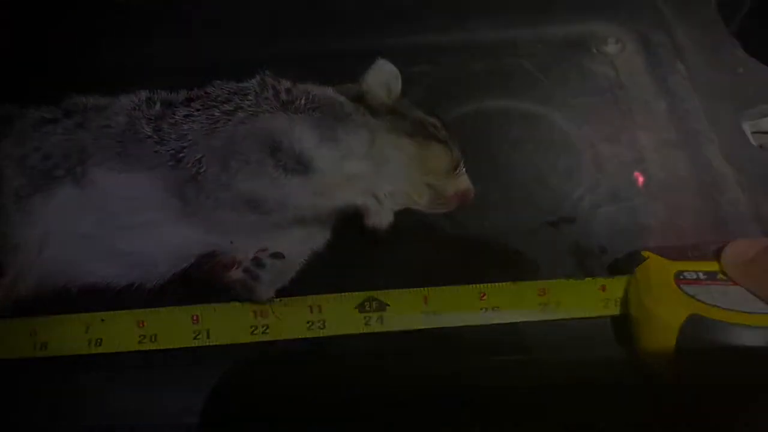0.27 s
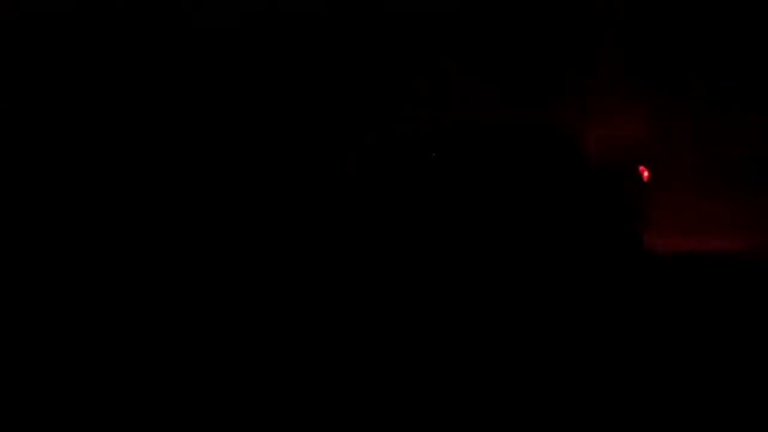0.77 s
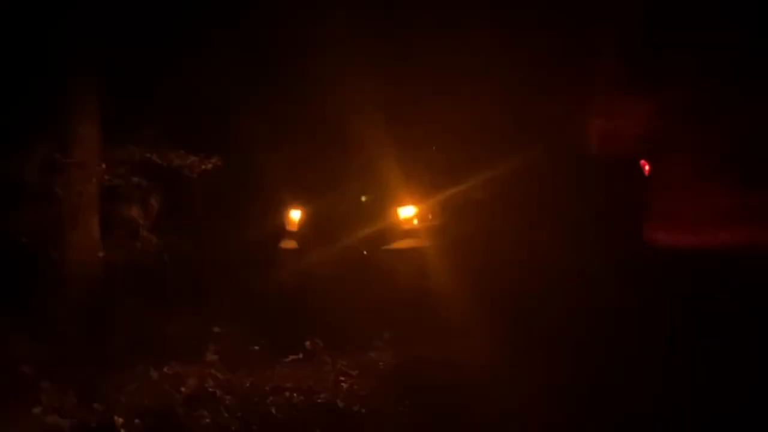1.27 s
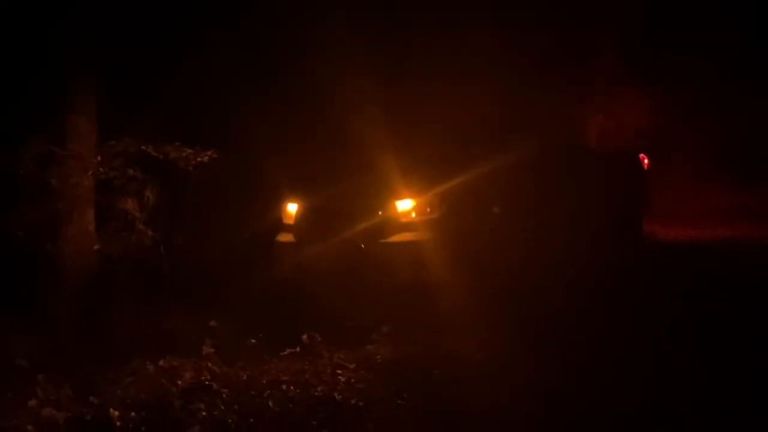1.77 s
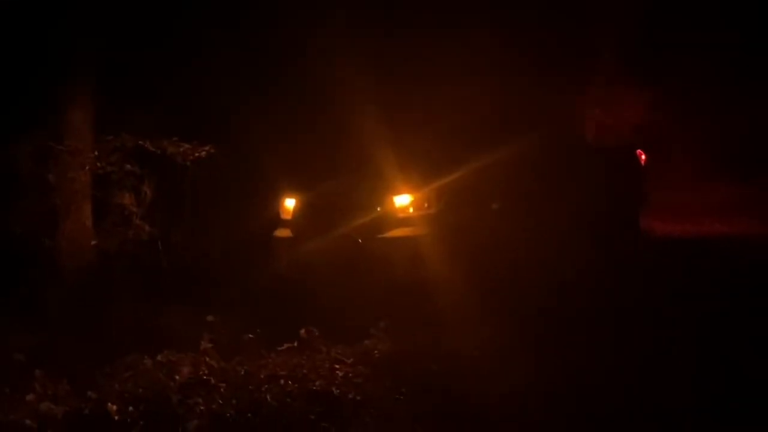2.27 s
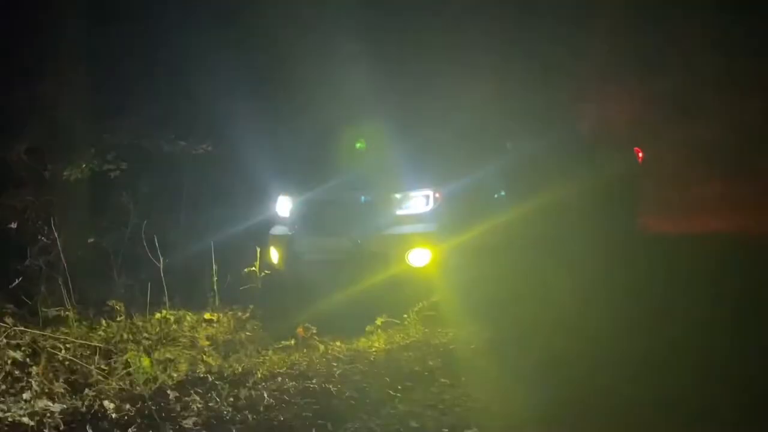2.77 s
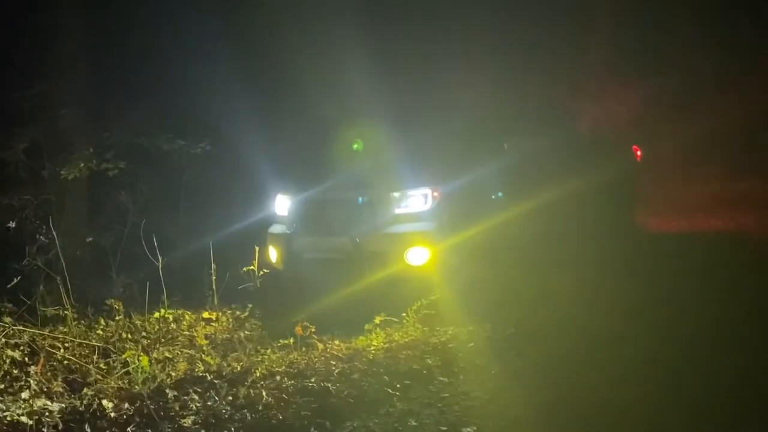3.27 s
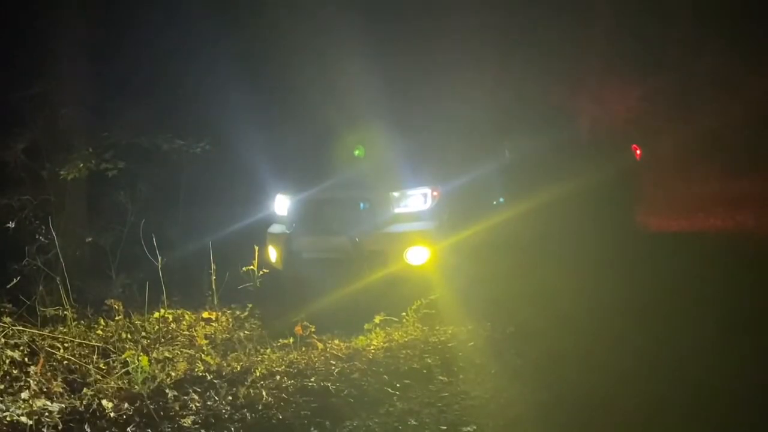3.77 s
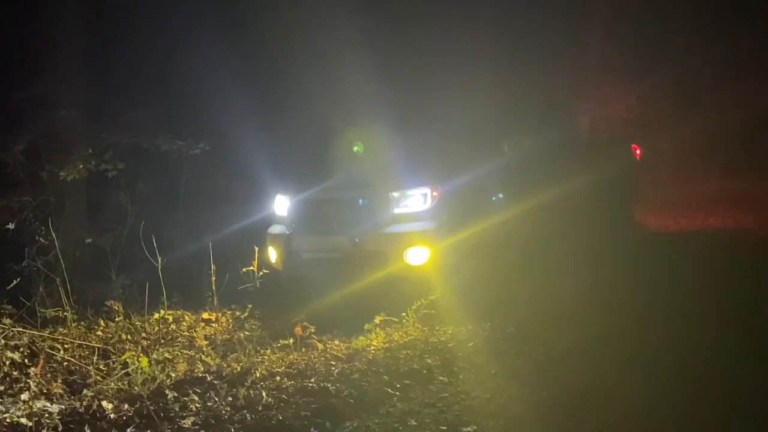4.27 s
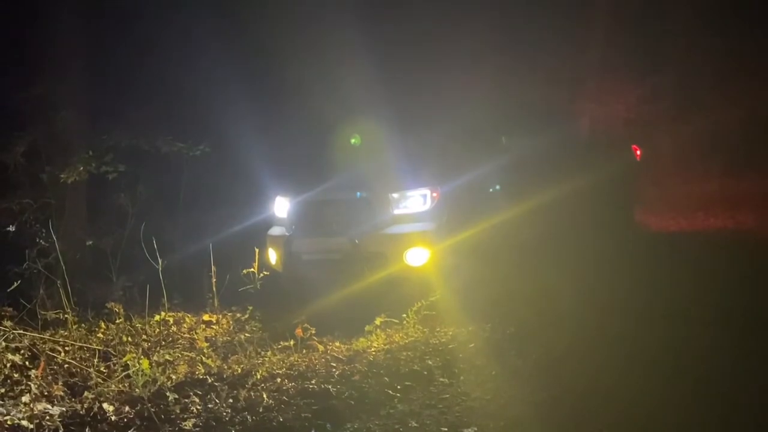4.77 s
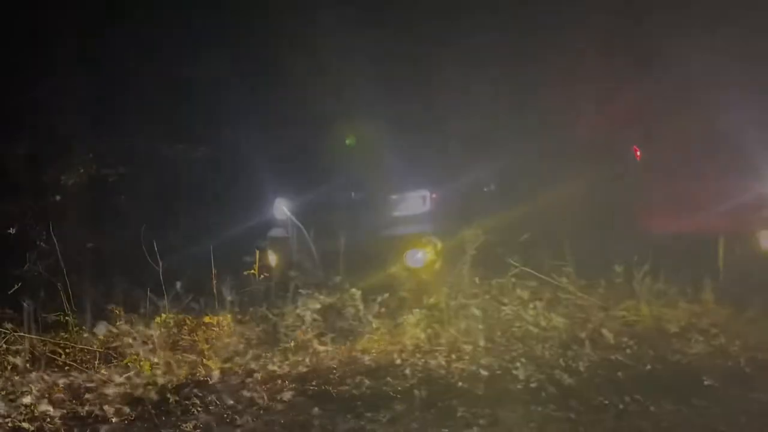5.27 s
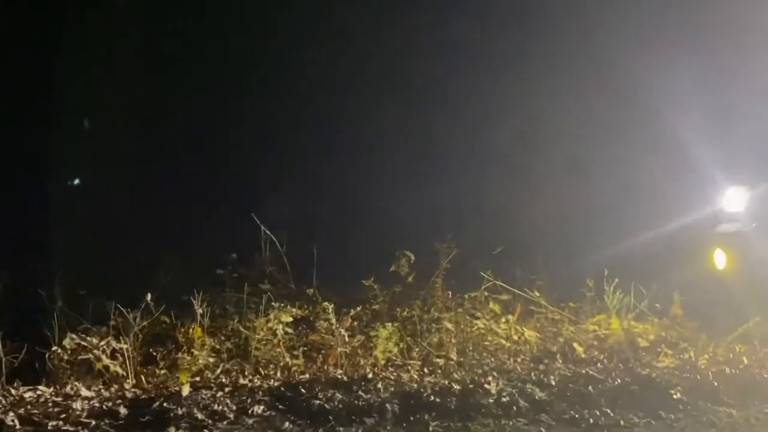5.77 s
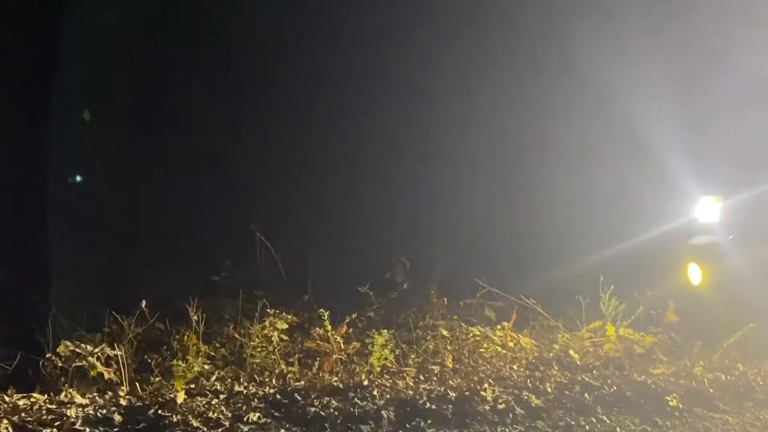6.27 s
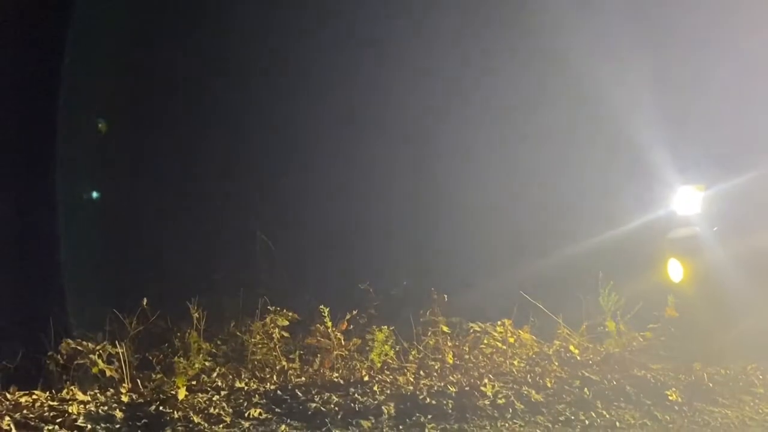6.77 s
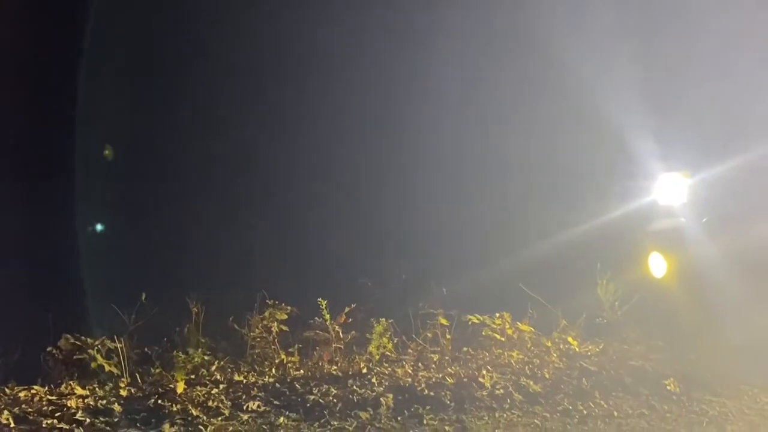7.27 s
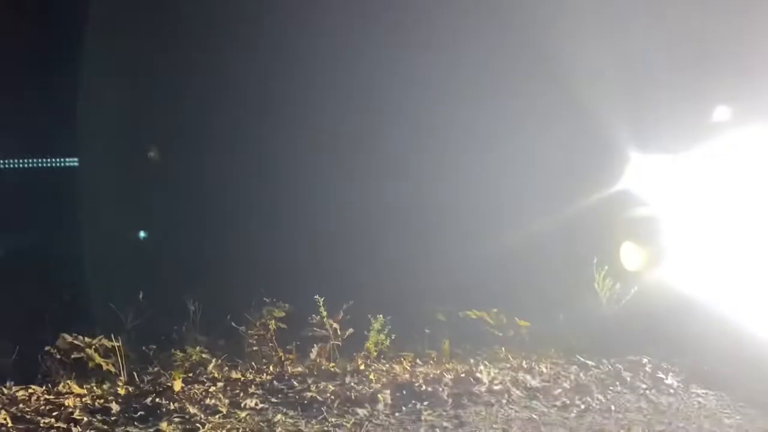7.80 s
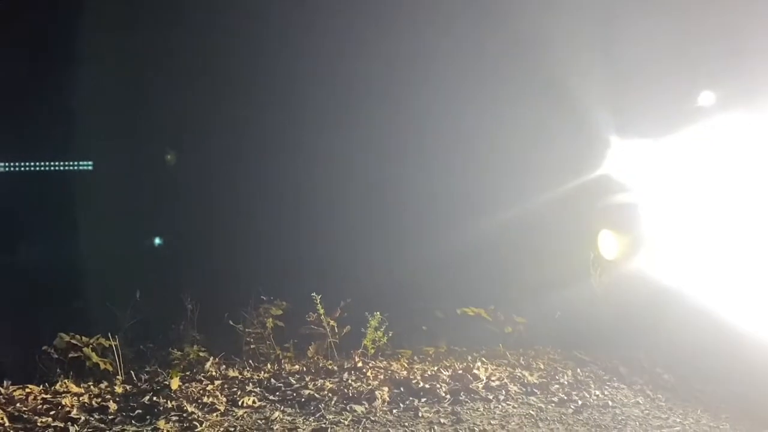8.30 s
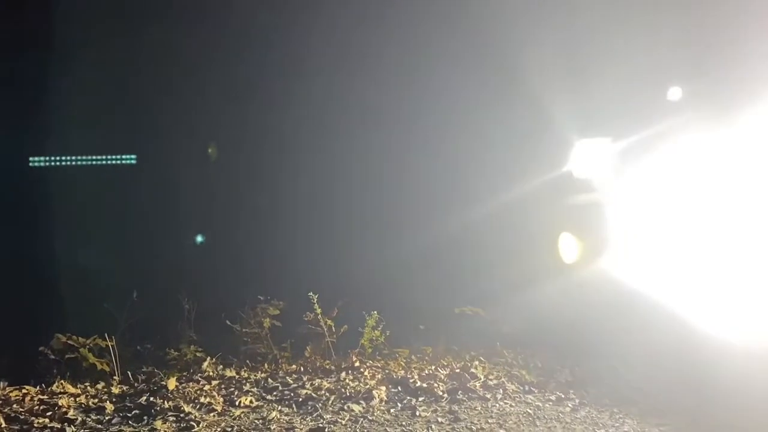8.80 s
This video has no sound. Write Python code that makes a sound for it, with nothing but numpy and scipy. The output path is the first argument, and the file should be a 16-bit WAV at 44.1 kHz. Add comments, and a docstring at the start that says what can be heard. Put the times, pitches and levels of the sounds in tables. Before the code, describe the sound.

Close, outdoors at night, over faint steady air noise. At 0-0.4 s a starter gives hard clacks and a swelling bright hiss. The V8 catches, flares to a peak around 0.7 s, and settles by 1.2 s into an even, deep, burbling fast idle with soft engine clatter, faint belt whine and a very thin electric whine. Tiny scratchy squeaks come occasionally. Around 3.5-3.7 s there are dull knocks and a short scuff. From 4.2 to 4.7 s the revs drop to nearly half as gear engages, then rise gently from 5.1 s. Tyres begin rolling around 5.4 s: dull stone grinding, gritty crunch, frequent pops. At 6.2 s one stone snaps very loudly with a hollow thump. Revs ease near 7 s while a low hum joins; an even louder single knock hits at 8.5 s, a sharper squeak at 8.8 s, as the engine pushes again to 9 s.

```python
"""A starter clacks and hisses at night, close by; a V8 pickup flares up, settles to a fast idle,
drops into gear and pulls away gently on a dirt track. Sines on the firing note and cylinder orders make
the exhaust; shaped noise makes the engine bay, tyres on gravel and night. Stones knock and crack, one of
each very loudly; short squeaks and a thin electric whine are wavering sines."""
import sys
import numpy as np
from scipy import signal
from scipy.fft import rfft, irfft, next_fast_len
from scipy.io import wavfile
from scipy.ndimage import uniform_filter1d, map_coordinates

SR = 44100
rng = np.random.default_rng(int(sys.argv[2]) if len(sys.argv) > 2 else 0)


def digitize_waveform(pressure):
    """Quantize a signal to 16-bit integers and store it at the path in sys.argv[1].

    Rows of a 2-D input are taken as channels; values are limited to [-1, 1].
    """
    field = np.atleast_2d(pressure).T
    bounded = np.clip(field, -1, 1)
    quanta = np.round(bounded * 32767).astype(np.int16)
    wavfile.write(sys.argv[1], SR, quanta)


N = 398663

# how sounds from the engine bay side and from the wheel side meet the two microphone ports:
# freq_hz, left_minus_right_db, left_lead_rad, likeness (0..1)
ENGINE_SIDE = [(70, -2, -0.3, 0.82), (164, -2.5, -0.5, 0.9), (300, -.5, 0.18, 0.89), (604, 1.5, 0.24, 0.76),
               (1130, 4, 0.66, 0.81), (1800, 5, 0.45, 0.81), (2380, -2, 0, 1), (2740, 0, 0, 1),
               (7200, 0, 0, 1), (8970, -0.5, -3, 1), (16000, 0, -13, 0.65)]
WHEEL_SIDE = [(70, -1, 0, 0.96), (300, -2, -0.5, 1), (603, -6.5, -0.7, 0.96), (1050, -5, -1.05, 0.94),
              (1760, -1.5, -2.5, 1), (2200, -1, -1, .75), (2470, 0.5, 0, 1), (7330, 0, 0, 1),
              (8820, -0.5, -2.5, 1), (16000, 0, -13, 0.78)]
# dull colour of stones under the tread: freq_hz, density_db_per_hz
GRIND_COLOUR = [(80, -8.5), (220, 3.5), (450, -1.5), (800, 2), (1230, 3), (1500, -10), (2500, -13.5),
                (6000, -49)]


def amp(db):
    """Amplitude ratio of a level in dB."""
    return np.exp(np.asarray(db) * (np.log(10) / 20))


def unit(x):
    """x scaled to rms 1."""
    return x / np.sqrt(np.mean(x ** 2) + 1e-20)


def along(points, hz):
    """Interpolate (Hz, value) points on a log frequency axis."""
    f, v = np.transpose(points)
    return np.interp(np.log(hz + 1), np.log(f + 1), v)


def curves(rows):
    """One value per sample for each column after the time."""
    s, *cols = np.transpose(rows)
    return [np.interp(np.arange(N) / SR, s, c) for c in cols]


def since(s):
    """Seconds gone by since time s, zero before it."""
    return np.maximum(np.arange(N) / SR - s, 0)


def wobble(rate_hz):
    """A smooth random curve with rate_hz knots a second."""
    coarse = np.arange(0, N + 32, 32)
    knots = rng.standard_normal(int(N * rate_hz / SR) + 4)
    values = map_coordinates(knots, [coarse * rate_hz / SR])
    return np.interp(np.arange(N), coarse, values)


def filtered(x, response):
    """x times a complex response of frequency."""
    m = next_fast_len(x.shape[-1] + 8192)
    return irfft(rfft(x, m) * response(np.fft.rfftfreq(m, 1 / SR)), m)[..., :x.shape[-1]]


def coloured(x, spectrum):
    """x through a causal (minimum-phase) filter with the given spectrum."""
    size = 8192
    cepstrum = irfft(np.log(amp(along(spectrum, np.fft.rfftfreq(size, 1 / SR)))))
    # fold the cepstrum to its causal half
    cepstrum[1:size // 2] *= 2
    cepstrum[size // 2 + 1:] = 0
    impulse = irfft(np.exp(rfft(cepstrum)))
    return signal.oaconvolve(x, impulse[None], axes=1)[:, :x.shape[1]]


def noise():
    """Two unrelated channels of white noise."""
    return rng.standard_normal((2, N))


def grains(rate_hz, scatter_db):
    """Random tiny impacts of very unequal size, rms 1."""
    sizes = amp(scatter_db * np.minimum(rng.exponential(size=N), 4))
    return unit(noise() * sizes * (rng.random(N) < rate_hz / SR))


def add(track, s, sound):
    """Mix a sound into the track at time s."""
    part = track[..., round(s * SR):][..., :sound.shape[-1]]
    part += sound[..., :part.shape[-1]]


def placed(pair, place):
    """Two unrelated signals become left and right; a single one is a point source."""
    size = next_fast_len(N + 8192, real=True)
    hz = np.fft.rfftfreq(size, 1 / SR)
    lean_db, lead_rad, alike = (along(np.array(place)[:, [0, k]], hz) for k in range(1, 4))
    turn = np.arccos(np.clip(alike, -1, 1)) / 2
    left = amp(lean_db / 2) * np.exp(1j * lead_rad / 2)
    sides = np.array([[1], [-1]])
    shares = np.cos(turn), sides * np.sin(turn)  # in common, in opposition
    mix = sum(z * share for z, share in zip(rfft(pair, size), shares))
    return irfft(np.array([left, 1 / left]) * mix, size)[:, :N]


def exhaust(firing_hz, cycle):
    """The firing note and the burble of uneven cylinders sweep through the pipe's resonances."""
    load = [(.2, -60), (.24, -45), (.31, -38), (.39, -37), (.425, -37), (.46, -31.5), (.56, -32.5),
            (.61, -33.5), (.7, -32.5), (1.02, -36.5), (1.2, -40), (4.2, -41), (5.1, -46), (6.3, -37.5),
            (7.1, -41.5), (8.4, -38.5), (9.04, -38.5)]  # how hard the engine works: time_s, exhaust_db
    # tailpipe boom met by the firing note and its octave: freq_hz, gain_db
    boom = [(45, -10), (57, -7), (66, 3.5), (73, 7), (84, -4.5), (99, -6), (108, 4.5), (120, -1.5),
            (140, -10), (200, -23)]
    cylinders = [(3, -1), (4, -15), (5, -10), (6, -9.5), (7, -17), (9, -15), (10, -10), (11, -10),
                 (12, -14), (13, -6), (14, -9), (15, -17), (17, -24), (18, -17), (19, -11), (20, -10),
                 (21, -14.5), (22, -11), (23, -11.5), (24, -17)]  # uneven cylinders: multiple_of_cycle, level_db
    pipe = [(20, -46), (38, -14.5), (55, -9), (68, 1.5), (90, -2.5), (112, -1), (138, -3), (153, 1.5),
            (163, 9.5), (171, 4.5), (180, -5), (200, -16.5), (270, -9), (400, -28.5), (900, -38)]  # exhaust system resonances: freq_hz, gain_db
    pull_db, pull_lag_s = 1.3, 0.078  # gain per octave/s of acceleration; a loss on the overrun
    load_db, = curves(load)
    acceleration = uniform_filter1d(np.gradient(np.log2(firing_hz)) * SR, round(pull_lag_s * SR))
    note_db = load_db + along(boom, firing_hz) + pull_db * acceleration
    octave_db = load_db + along(boom, 2 * firing_hz) - 0.8
    phase = 2 * np.pi * 8 * cycle  # eight firings a cycle
    note = amp(note_db + 1.03 * wobble(22)) * np.sin(phase)
    note += amp(octave_db + 1.5 * wobble(15)) * np.sin(2 * phase)

    burble, power = np.zeros(N), np.zeros(N)
    for order, db in cylinders:
        gain = amp(db + along(pipe, order * firing_hz / 8))
        roughness = 1 + 0.16 * wobble(9)
        burble += gain * roughness * np.sin(2 * np.pi * (order * cycle + rng.random()))
        power += gain ** 2 / 2
    tones = np.sqrt(2) * note + amp(load_db - 0.73) * burble / np.sqrt(power) + drone()
    puffs = amp(load_db - 9.5) * unit(coloured(noise(), pipe))
    return placed(tones[None], ENGINE_SIDE) + placed(puffs, ENGINE_SIDE)


def drone():
    """A wavering low hum sets in and holds its pitch while the truck rolls."""
    start_s, rise_s, pitch_hz, level_db = 6.6, .3, 251, -49
    swell = np.minimum(since(start_s) / rise_s, 1)
    phase = 2 * np.pi * pitch_hz * since(0) + 0.45 * wobble(9)
    return swell * amp(level_db + 2 * wobble(7)) * np.sin(phase)


def engine_bay(firing_hz, cycle):
    """Valves and injectors rattle the block in step with the shaft, louder with speed and nearness."""
    block = [(100, -15.5), (250, 2), (400, -2), (650, 1.5), (870, -4), (1230, 2.5), (1450, -7),
             (1650, -1.5), (2300, -4), (2550, -11.5), (2900, -5.5), (4300, -10.5), (6800, -20.5),
             (8500, -29.5), (12000, -19.5), (16000, -45)]  # engine bay colour: freq_hz, density_db_per_hz
    panels = [(533, 19, 1.5), (768.4, 37, 10), (2118, 18, 8), (2910, 160, -5.5), (5100, 120, -4.5)]  # ringing panels: freq_hz, width_hz, gain_db
    catch_s, catch_rise_s = 0.18, 0.063  # the engine fires and comes to life
    clatter_db, idle_hz, db_per_octave = -43.5, 101.4, 10.5  # level at fast idle, growth with speed
    full_hz = 115  # above this firing rate the clatter grows no further
    approach_db = 2.5 * since(6.17)  # the bay comes nearer, dB from a rate per second

    turn = 2 * np.pi * cycle
    ticks = 1 + 0.1 * np.cos(8 * turn) + 0.057 * (np.cos(turn) + np.cos(2 * turn))
    blows = ticks * (noise() + 0.34 * grains(rate_hz=900, scatter_db=-0.5))
    blows[0] += .28 * repeating(cycle)

    def ringing(f):
        return sum(amp(db) * 1j * f * w / (c * c - f * f + 1j * f * w) for c, w, db in panels)

    # the panels' share shrinks as the rest comes nearer
    panel_ring = amp(-approach_db) * filtered(ticks * noise(), ringing)
    clatter = unit(coloured(blows, block) + panel_ring)
    speed_db = db_per_octave * np.log2(np.minimum(firing_hz, full_hz) / idle_hz)
    level_db = clatter_db + speed_db + approach_db
    running = np.minimum(since(catch_s) / catch_rise_s, 1)
    belts = running * accessories(cycle)
    return placed(running * amp(level_db) * clatter, ENGINE_SIDE) + placed(belts[None], ENGINE_SIDE)


def repeating(cycle):
    """One random pattern of valve-train blows comes round again with every cycle."""
    size = 4096
    orders = np.arange(size // 2 + 1)
    gains = amp(6 * rng.standard_normal(len(orders))) * (orders > 44) * (orders < 240)
    pattern = irfft(gains * np.exp(2j * np.pi * rng.random(len(orders))))
    return unit(np.interp(cycle % 1 * size, np.arange(size), pattern))


def accessories(cycle):
    """Belt-driven accessories sing on multiples of the engine cycle, swelling now and then."""
    # swells of the whine: middle_s, half_length_s, level_db, multiple_of_cycle
    whines = [(.68, .15, -46, 40), (.87, .1, -52, 48), (2.35, .5, -45, 40), (3.3, 1.2, -52, 36),
              (4.38, .22, -52.5, 40), (5.7, .4, -57, 40), (7.7, .4, -48, 40), (8.7, .35, -46, 40)]
    belt_db = -67.5  # each accessory between its swells, before flutter
    song = np.zeros(N)
    for order in (36, 40, 48):
        swells = sum(amp(db) * np.exp(-((since(0) - s) / half) ** 2)
                     for s, half, db, k in whines if k == order)
        flutter = amp(1.25 * wobble(9))
        phase = 2 * np.pi * order * cycle + 0.3 * wobble(12)
        song += (amp(belt_db) + swells) * flutter * np.sin(phase)
    return song


def starter():
    """The solenoid clacks, and the pinion's hiss swells until it lets go."""
    clack_rows = [(0.039, -29.5), (0.117, -30.5), (0.427, -28.5)]  # clacks: start_s, peak_db
    clack_colour = [(150, -18), (360, 8), (560, -10), (800, 4.5), (950, -22), (1150, 8.5), (1400, -3),
                    (2000, 2.5), (2600, -9), (6000, -12), (16000, -26)]  # clack colour: freq_hz, gain_db
    gear_colour = [(2500, -6), (5000, -2), (7000, -3), (8500, -19), (11500, -10.5), (16000, -30)]  # pinion hiss: freq_hz, density_db_per_hz
    rise_s, end_s, release_s, hiss_db = 0.38, 0.434, 0.044, -45.5
    clacks = bursts(clack_rows, clack_colour, t60_s=0.13, tail_db=-3, tail_t60_s=0.33)
    # the pinion drops back
    clacks = clacks + thud(s=.425, db=-35, t60_s=.09, body_db=-33, body_hz=600, body_t60_s=.06)
    spin = np.minimum(since(0) / rise_s, 1) * np.exp(-since(end_s) / release_s)
    hiss = amp(hiss_db) * spin * unit(coloured(noise(), gear_colour))
    return placed(clacks[None], ENGINE_SIDE) + placed(hiss, ENGINE_SIDE)


def bursts(events, spectrum, t60_s, tail_db, tail_t60_s):
    """Hard contacts: a crack and a weaker rattle after it, in the colour of what is hit."""
    out, t = np.zeros(N), np.arange(SR // 4) / SR
    for s, db in events:
        decay = amp(-60 * t / t60_s) + amp(tail_db - 60 * t / tail_t60_s)
        shape = decay * (1 - np.exp(-t / 0.0012))
        hit = coloured(shape * rng.standard_normal((1, len(t))), spectrum)[0]
        add(out, s, amp(db) * hit / np.abs(hit).max())
    return out


def tyres():
    """Stones grind dully under the tread while grit crunches at its edge."""
    rolling_levels = [(5.2, -68, -60), (5.55, -50, -51), (6.05, -44, -46), (6.4, -40, -43),
                      (6.85, -41.5, -48), (7.35, -40, -46), (7.7, -40, -48.5), (8.35, -40, -49.5),
                      (8.95, -36.5, -41.5)]  # rolling tyres, before trims: time_s, grind_db, crunch_db
    crunch_colour = [(800, -11), (2450, -11), (2800, -1.5), (3050, .3), (3700, -1.5), (4300, -5),
                     (5050, -1.5), (5600, -5), (6110, -2), (6450, -7), (6900, -6), (8500, -12), (11000, -9),
                     (16000, -16)]  # grit: freq_hz, density_db_per_hz
    grind_db, crunch_db = curves(rolling_levels)
    rolling = amp(curves([(0, -60), (4.9, -9), (5.2, -3), (5.6, -1)])[0])
    grind = unit(coloured(.7 * noise() + grains(rate_hz=800, scatter_db=1.8), GRIND_COLOUR))
    grind = grind + loose_stones()
    crunch = unit(coloured(noise() + 0.5 * grains(rate_hz=900, scatter_db=3.5), crunch_colour))
    ground = amp(grind_db + .2 + 1.45 * wobble(16)) * grind
    ground += amp(crunch_db + 2.5 + 1.304 * wobble(20)) * crunch
    return placed(rolling * ground, WHEEL_SIDE)


def loose_stones():
    """Single small stones clack out of the grinding at random."""
    impacts = grains(rate_hz=60, scatter_db=1.5)[:1]
    return amp(-8) * unit(coloured(impacts, GRIND_COLOUR))


def knocks():
    """A knock with a crack and a rattle: its pitch drops quickly to rest, and a weaker echo answers."""
    # dull knocks while the truck stands, then stones popping under the tread: start_s, pop_db, rest_hz
    knock_rows = [(3.476, -33, 300), (3.549, -34, 550), (3.607, -28.5, 400), (3.699, -35, 380),
                  (4.6, -37, 640), (5.141, -39, 620), (5.336, -39, 560), (5.934, -30, 280),
                  (5.955, -25.5, 420), (6.069, -24.5, 380), (6.121, -29, 500), (6.361, -23.5, 420),
                  (6.578, -29, 560), (6.658, -24.5, 560), (6.737, -29, 380), (6.841, -20.5, 400),
                  (6.865, -29.5, 360), (6.9, -25, 420), (7.039, -30, 540), (7.203, -27, 540),
                  (7.742, -23, 540), (7.768, -31, 500), (8.195, -31, 760), (8.373, -28, 640),
                  (8.4888, -4.5, 510), (8.859, -26, 380), (8.947, -21, 660)]
    crack_tones = [(2000, -4), (3000, -1), (5000, -7), (6800, -22)]  # brief crack at the onset: freq_hz, level_db
    rattle_colour = [(150, -11), (400, 11.5), (700, 14), (1300, 1), (1800, -11), (3000, -3), (5300, -26),
                     (7500, -35)]  # rattle after the onset: freq_hz, gain_db
    rise_s, extra_hz, relax_s = 0.0016, 900, .0015  # as rubber relaxing under a stone
    crack_s, crack_width_s, crack_db = 0.000764, .00035, -13
    rattle_db, rattle_t60_s = -15, 0.078
    echo_s, echo_db = 0.007775, -15  # the underbody's answer
    out, t = np.zeros(N), np.arange(SR // 12) / SR
    after = t - crack_s
    for s, db, rest_hz in knock_rows:
        hz = rest_hz + extra_hz * np.exp(-t / relax_s)
        envelope = (t / rise_s * np.exp(1 - t / rise_s)) ** 2
        pop = envelope * np.sin(2 * np.pi * np.cumsum(hz) / SR)
        tones = sum(amp(level) * np.cos(2 * np.pi * f * after) for f, level in crack_tones)
        crack = np.exp(-(after / crack_width_s) ** 2) * tones
        rattle = unit(coloured(rng.standard_normal((1, len(t))), rattle_colour))[0]
        rattle = rattle * amp(rattle_db - 60 * t / rattle_t60_s)
        add(out, s, amp(db) * (pop + amp(crack_db) * crack + rattle))
        add(out, s + echo_s, amp(db + echo_db) * pop)
    return out


def snaps():
    """Stones crack under the tread: chips tick short and bright, larger ones scatter duller fragments."""
    # stones cracking, before a lift in scene(): start_s, level_db, treble_tilt_db_per_octave, t60_s
    snap_rows = [(5.498, -34, 0, .012), (5.723, -31, 6, .012), (6.184, -27, 0, .015), (6.212, -6, 0, .022),
                 (6.36, -26, 0, .01), (7.167, -24, 6, .007), (7.353, -28, 6, .01), (7.376, -30, 5, .007),
                 (7.404, -31, -1, .008), (7.757, -26, -3, .012), (7.95, -27, -2, .012),
                 (8.194, -26, -4, .01), (8.358, -31, 4, .02), (8.657, -27.5, 7, .015)]
    shard = [(120, -8), (260, -2), (450, 3), (720, 8), (1050, -5), (1350, -1), (1750, -5), (2050, 0),
             (2300, -9), (3050, 5), (3700, 1), (4400, -1.5), (5100, 2), (5600, -3), (6100, 2), (7000, -4),
             (8000, -4), (11000, -8), (16000, -15)]  # colour of a cracking stone: freq_hz, gain_db
    chip_hz = 2500  # above this a stone's size tilts its colour
    rise_share, tail_db, tail_times = 0.064, -13, 5.8  # rise and tail in multiples of t60
    out, t = np.zeros(N), np.arange(SR // 4) / SR
    for s, db, tilt_db, t60_s in snap_rows:
        decay = amp(-60 * t / t60_s) + amp(tail_db - 60 * t / (tail_times * t60_s))
        shape = decay * (1 - np.exp(-t / (rise_share * t60_s)))
        colour = [(hz, level + tilt_db * np.log2(max(hz / chip_hz, 1))) for hz, level in shard]
        hit = coloured(shape * rng.standard_normal((1, len(t))), colour)[0]
        crest = 3.2 * hit[:round(.4 * t60_s * SR)].std()  # typical peak of the onset
        add(out, s, amp(db) * hit / crest)
    return out


def thud(s=6.214, db=-25, t60_s=0.13, body_db=-16.5, body_hz=670, body_t60_s=.023):
    """A hollow thump and a brief boom, as when the tyre drops off the stone that snaps."""
    out, t = np.zeros(N), np.arange(SR // 4) / SR
    thump = np.sin(2 * np.pi * 265 * t) + 0.66 * np.sin(2 * np.pi * 135 * t)
    add(out, s, amp(db - 60 * t / t60_s) * thump)
    add(out, s, amp(body_db - 60 * t / body_t60_s) * np.sin(2 * np.pi * body_hz * t))
    return out


def scuff():
    """Dull scuffing on the ground: briefly while the truck still stands, longer as it starts to roll."""
    scuff_rows = [(3.58, 0.19, -47, 263), (6.497, 0.67, -44, 424)]  # scuffs: middle_s, half_length_s, level_db, centre_hz
    scuff_colour = [(.48, -12), (1, 10), (1.6, -1.5), (3.6, -8), (7.2, -27), (24, -45)]  # scuff colour: multiple_of_centre, gain_db
    out, grit = np.zeros((2, N)), grains(rate_hz=220, scatter_db=2.0)
    for s, half, db, hz in scuff_rows:
        dirt = unit(coloured(grit, np.array(scuff_colour) * [hz, 1]))
        out += amp(db) * np.exp(-((since(0) - s) / half) ** 2) * dirt
    return placed(out, WHEEL_SIDE)


def squeaks():
    """Brief scratchy squeaks stutter and sag a little in pitch, with a rasp at the start."""
    squeak_rows = [(1.0, -44, 5100), (1.2, -40.5, 5040), (1.715, -44, 5190), (2.728, -45, 4980),
                   (3.51, -44, 5010), (4.02, -42, 5090), (4.13, -48, 4990), (4.375, -45, 5234),
                   (4.465, -41.5, 5160), (5.05, -46.5, 5170), (5.18, -45.5, 4960), (5.335, -43.5, 5150),
                   (5.49, -42, 5080), (5.99, -37, 5000), (6.132, -32, 5100), (6.42, -36, 4950),
                   (6.989, -33, 5160), (7.91, -41, 4920), (8.034, -37, 5300), (8.255, -45, 5200),
                   (8.792, -25, 5030)]  # squeaks, before a 4.5 dB cut: start_s, level_db, pitch_hz
    rasp_colour = [(3000, -16), (5000, 3), (5800, -4), (6600, -0.5), (7600, -4.5), (9500, -14.5)]  # scratchy edge: freq_hz, gain_db
    length_s, waver_rad, stutter_db, rasp_db = .045, .8, 6.5, -4
    out, t = np.zeros(N), np.arange(SR // 10) / SR
    u = np.clip(t / length_s, 0, 1)
    for s, db, hz in squeak_rows:
        smooth = uniform_filter1d(rng.standard_normal((2, len(t))), size=110)
        flutter, stutter = unit(uniform_filter1d(smooth, size=70))
        sagging_hz = hz * (1 + 0.034 * (.5 - u))
        phase = 2 * np.pi * np.cumsum(sagging_hz) / SR + waver_rad * flutter
        stutter_gain = unit(amp(stutter_db * np.tanh(stutter)))
        tone = np.sin(np.pi * u ** 0.66) ** 2 * stutter_gain * np.sin(phase)
        scratch = unit(coloured(rng.standard_normal((1, len(t))), rasp_colour))[0]
        rasp = np.sin(np.pi * u ** 0.43) ** 2 * scratch
        add(out, s, amp(db - 4.5) * (tone + amp(rasp_db) * rasp))
    return out


def motor():
    """A small electric motor spins up after the start, holds a thin whine, then slowly fades."""
    on_s, spin_up_s, pitch_hz, whine_db = .25, .22, 11800, -65
    fade_s, fade_db_per_s = 5, .6
    speed = 1 - np.exp(-since(on_s) / spin_up_s)
    level_db = whine_db - fade_db_per_s * since(fade_s) + 2.5 * wobble(20)
    hz = pitch_hz * speed + 22 * wobble(150)
    return speed ** 5 * amp(level_db) * np.sin(2 * np.pi * np.cumsum(hz) / SR)


def night_air():
    """Steady background: coloured noise."""
    night_colour = [(25, -17), (80, 7), (200, 5), (1100, -0.5), (3000, -8.5), (6500, -15), (10000, -23.5),
                    (16000, -28)]  # steady background: freq_hz, density_db_per_hz
    return placed(amp(-51.5) * unit(coloured(noise(), night_colour)), ENGINE_SIDE)


def scene():
    """One engine shaft drives exhaust and engine bay; the other sources are added."""
    # flare, fast idle, into gear, two gentle pushes on the pedal: time_s, firing_hz
    speed_rows = [(.2, 47.16), (.33, 68), (.4, 78.9), (.47, 101.1), (.55, 111), (.61, 119.5), (.71, 121.9),
                  (.87, 111), (1.2, 101.4), (1.6, 98.64), (2.2, 102), (3.9, 104.9), (4.15, 101.2),
                  (4.45, 81.05), (4.7, 55.03), (5.05, 55.53), (5.25, 65.94), (5.7, 68.3), (6.42, 69.82),
                  (6.85, 57.97), (7.3, 56), (7.92, 57.98), (8.55, 72.6), (9.04, 74)]
    firing_hz, = curves(speed_rows)
    cycle = np.cumsum(firing_hz) / SR / 8  # four-stroke cycles gone by
    engine = exhaust(firing_hz, cycle) + engine_bay(firing_hz, cycle)
    stones = knocks() + thud() + amp(1.5) * snaps()
    shrill = squeaks() + motor()
    points = placed((stones + shrill)[None], WHEEL_SIDE)
    return engine + starter() + tyres() + scuff() + points + night_air()


def record(dry):
    """Nothing is kept above the band limit of 15.9 kHz."""
    return filtered(dry, lambda hz: hz < 15900)


dry = scene()
out = record(dry)
digitize_waveform(out)
```